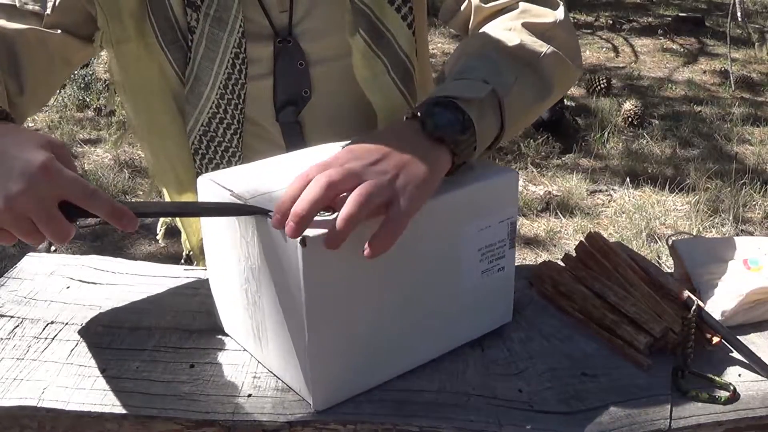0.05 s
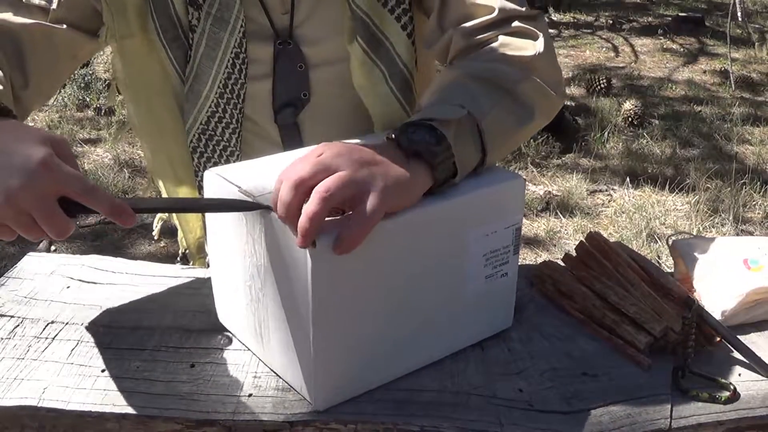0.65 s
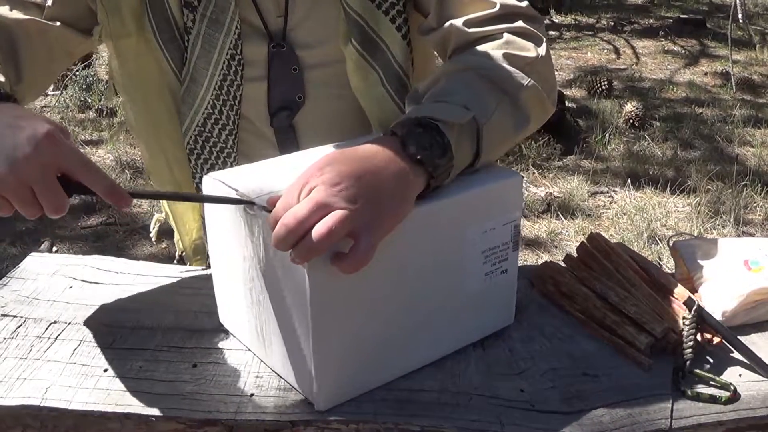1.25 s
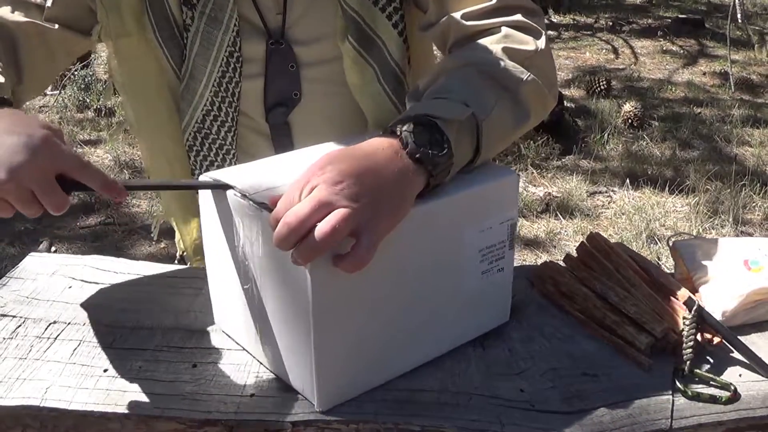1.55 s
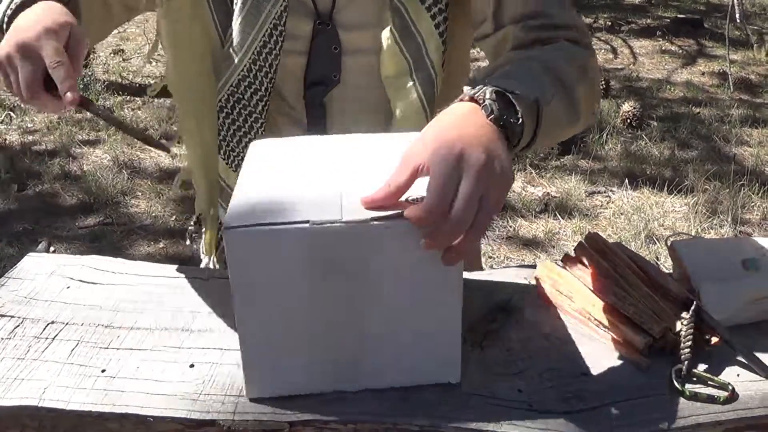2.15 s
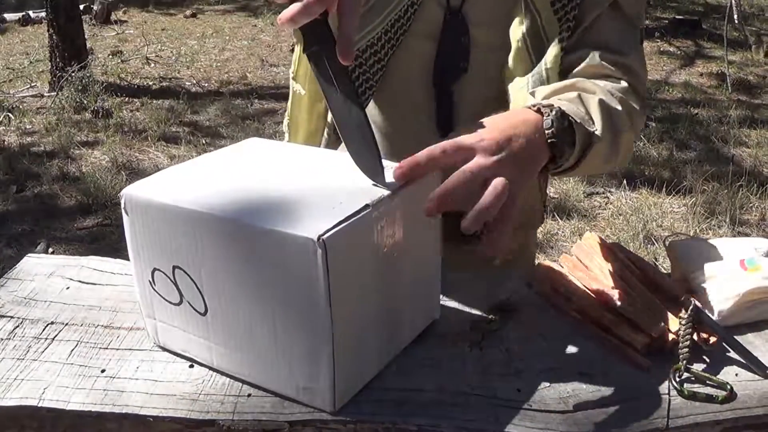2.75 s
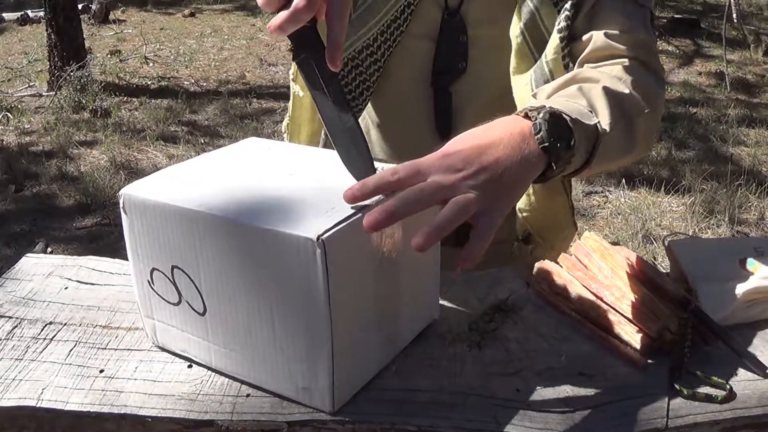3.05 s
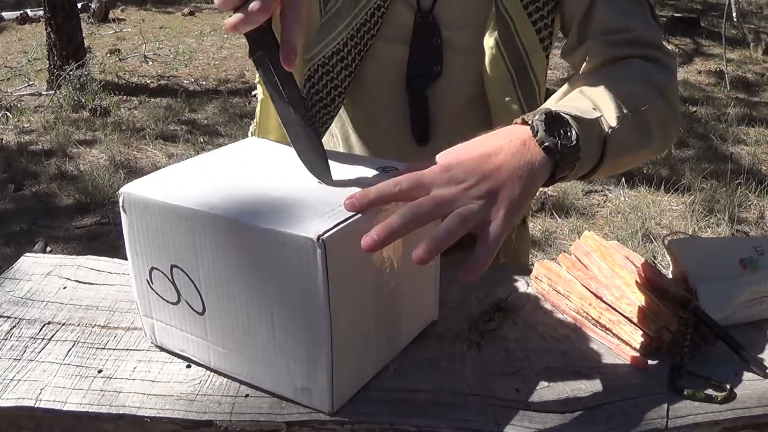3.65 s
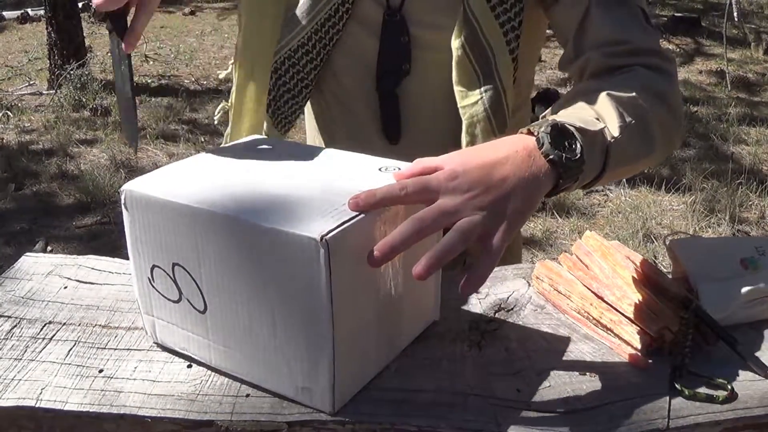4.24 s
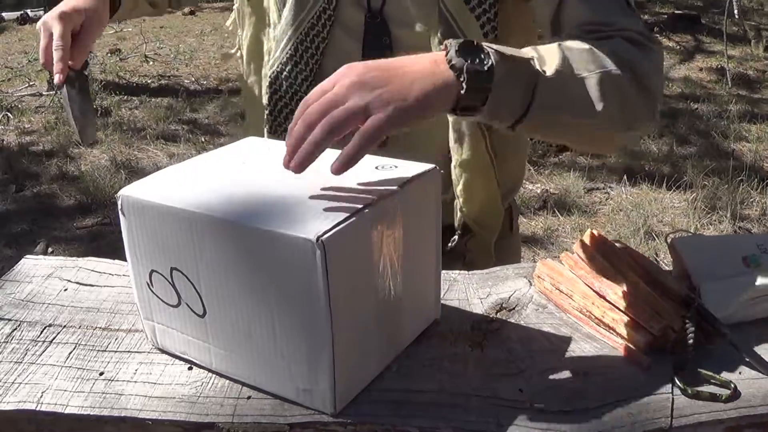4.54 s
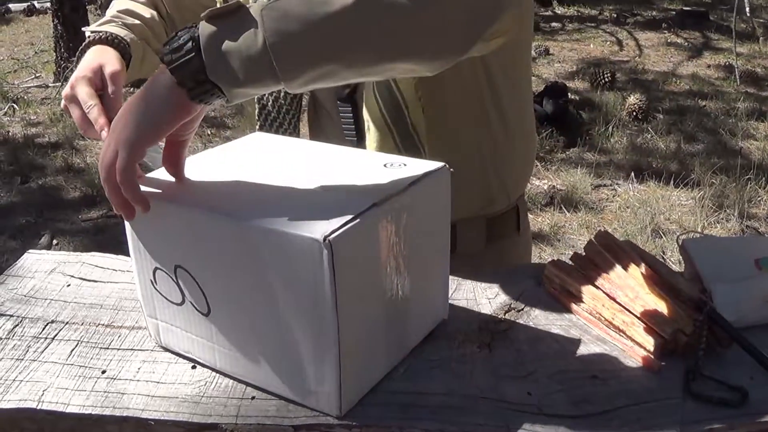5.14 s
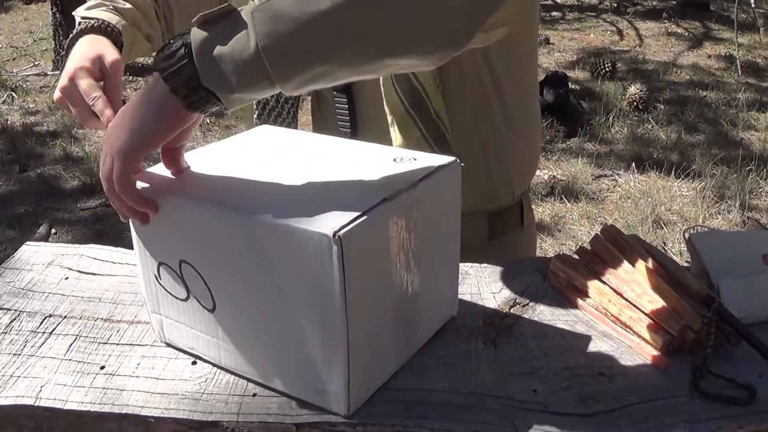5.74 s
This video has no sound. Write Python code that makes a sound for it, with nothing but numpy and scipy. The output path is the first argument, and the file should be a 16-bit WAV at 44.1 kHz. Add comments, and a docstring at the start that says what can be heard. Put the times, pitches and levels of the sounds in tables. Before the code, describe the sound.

A knife cuts packing tape on a cardboard box, close to the microphone and slightly left, over faint, still outdoor air. Short hissing, rasping strokes begin at once, and the blade judders with a low buzz from 0.7 to 1 second. Bright tape snaps and hollow knocks build to a loud pop at about 1.4 seconds as the flap springs free. From 1.5 to 2.6 seconds the box is shoved round on a wooden table, scraping, booming and knocking, with more sharp ticks. After a lull, a snap and a firm knock come at 3.4 seconds. A long cut swells from 3.5 seconds and ends around 4.2 in a brief rising groan of the lid and a crack. Then fingers softly rub the cardboard and a sleeve swishes across it, with small taps. Near 5.8 seconds the knife is set on the box with a light ringing knock.

```python
"""A knife slits the packing tape of a cardboard box, close up on a wooden table outdoors.
The blade hisses through the tape, judders along the flap and shakes the hollow box; tape snaps,
panels knock and the freed flap springs up. The box is shoved round, booming on the table top.
A long pull opens the second seam and ends in a rising groan of the lid. Fingers rub the lid,
a sleeve swishes across it, and the knife is set down on the box with a ringing knock."""
import sys
import numpy as np
from scipy import signal
from scipy.fft import rfft, irfft
from scipy.io import wavfile

SR = 44100
rng = np.random.default_rng(int(sys.argv[2]) if len(sys.argv) > 2 else 0)


def output_pcm(signal):
    """Save a mono or channel-first signal as 16-bit PCM at the path in sys.argv[1].

    Samples are clipped to [-1, 1] before scaling.
    """
    pcm = np.clip(np.atleast_2d(signal).T, -1, 1) * 32767
    wavfile.write(sys.argv[1], SR, np.round(pcm).astype(np.int16))


N = 255339
TIME = np.arange(N) / SR
HZ = np.fft.rfftfreq(N, 1 / SR)

# spectrum of rasping or cracking cardboard: f/Hz, level/dB
CARDBOARD_EQ = [(470, -10), (850, -3), (1250, -4), (1700, -1.5), (2100, -3), (2650, -3.5), (3500, -2.5),
                (4100, -6), (5100, -11.5), (6300, -5), (12000, -45)]
# spectrum of a bright tick of tape: f/Hz, level/dB
TICK_EQ = [(1500, -35), (3000, -12), (4200, -5), (5500, -9), (7500, -3), (10300, 2), (12000, 0),
           (13500, -6), (16000, -15)]


def amp(db):
    """Decibels to gain."""
    return 10 ** (np.asarray(db) / 20)


def unit(x):
    """Scales to rms 1."""
    return x / np.sqrt(np.mean(x ** 2) + 1e-20)


def peaked(x):
    """Scales to peak 1."""
    return x / abs(x).max()


def read(points, hz):
    """Reads a curve on a log-frequency axis."""
    f, value = np.transpose(points)
    return np.interp(np.log(hz + 1), np.log(f + 1), value)


def add(mix, s, sound):
    """Mixes a sound in at time s."""
    part = mix[max(round(s * SR), 0):][:len(sound)]
    part += sound[:len(part)]


def ring(x, response):
    """Passes x through an impulse response."""
    return signal.oaconvolve(x, response)[:len(x)]


def colour(eq, size=4096):
    """Minimum-phase impulse response of an EQ curve (f/Hz, level/dB)."""
    hz = abs(np.fft.fftfreq(size, 1 / SR))
    log_gain = np.log(amp(np.maximum(read(eq, hz), -100)))
    return np.fft.ifft(np.exp(np.conj(signal.hilbert(log_gain)))).real[:size // 2]


def drift(hz):
    """Random wander of rms 1, up to about the given rate."""
    return unit(irfft(rfft(rng.standard_normal(N)) / (1 + (HZ / hz) ** 4), N))


def burst(eq, t60, scatter, size=4096):
    """A sharp break followed by a quickly dying spray of smaller ones, peak 1."""
    spray = scatter * rng.standard_normal(size) * amp(-60 * np.arange(size) / SR / t60)
    spray[0] = 1
    return peaked(ring(spray, colour(eq)))


def clicks(per_s, spread_db):
    """Impulses at random times, a few much louder than the rest."""
    size = amp(spread_db * np.minimum(rng.exponential(1, N), 3))
    return size * (rng.random(N) < per_s / SR)


def swell(start, rise_s, fall_s, db, onset_db, fade_db, attack_s=0.0091, release_s=0.01):
    """Envelope of one stroke: it bites below its peak, swells, eases off and stops."""
    t, length = TIME - start, abs(rise_s) + abs(fall_s)
    gain = np.clip(np.minimum(t / attack_s, (length - t) / release_s) + 1, 0, 1)
    on = gain > 0
    gain[on] *= amp(db + np.interp(t[on], [0, abs(rise_s), length], [onset_db, 0, fade_db]))
    return gain


def stroke_power(strokes, onset_db, fade_db):
    """Power envelopes of hiss, rasp and shake over a series of strokes."""
    gains = np.array([swell(*row[:4], onset_db, fade_db) for row in strokes])
    shares = amp([(0, rasp_db, shake_db) for *_, rasp_db, shake_db in strokes])
    return shares.T ** 2 @ gains ** 2


def ambience(air_db=-59, whine_hz=15734, whine_db=-76):
    """A bed of still outdoor air, microphone hiss and the camera's thin whine."""
    # spectrum of the bed: f/Hz, level/dB
    air_eq = [(12, -46), (20, -15), (248, -7), (337, -2.5), (410, -6), (472, -5), (2080, -16), (2670, -13),
              (3160, -18), (11800, -23.5), (16000, -26)]
    # likeness of left and right: f/Hz, correlation
    correlation = [(60, 1), (240, 0.91), (950, 0.088), (3770, 0.68), (15000, 1)]
    left, independent = rfft(rng.standard_normal((2, N)))
    same = np.clip(read(correlation, HZ), -1, 1)
    right = same * left + np.sqrt(1 - same ** 2) * independent
    air = unit(irfft(np.array([left, right]) * amp(read(air_eq, HZ)), N))
    whine = unit(np.sin(2 * np.pi * whine_hz * TIME))
    return amp(air_db + .5 * drift(hz=15)) * air + amp(whine_db) * whine


def steadying_hand(until_s=2.83, wander_db=2.0):
    """Fingers shift faintly as they hold the box: power of hiss, rasp and shake."""
    gains = amp([-65, -61.5, -60.5])[:, None]
    return (gains * (TIME < until_s) * amp(wander_db * drift(hz=22))) ** 2


def short_cuts():
    """The blade works along the tape in short strokes: power of hiss, rasp and shake."""
    # t/s, swell/s, fade/s, hiss/dB, rasp/dB re hiss, shake/dB re hiss
    strokes = [(0, 0.01, 0.012, -55, 7, 3), (.083, 0.0067, 0.061, -59, -12, 7.5),
               (.19, 0.15, .04, -43.5, -0.5, -11.5), (.442, 0.0064, 0.062, -48.5, -2, -11),
               (.52, 0.017, .018, -46.5, 3, -16), (.654, 0.015, .028, -39.5, -4.5, -3),
               (.7, 0.16, .1, -47, 3.5, 4), (.91, 0.097, .02, -42, -1.5, -10),
               (.995, 0.06, 0.0047, -35, -11, -9.5), (1.07, .01, 0.26, -55.5, -4, -2),
               (1.208, 0.06, 0.0091, -35, -1.5, -1), (1.33, 0.087, 0.023, -55.5, -2, 5),
               (1.44, 0.022, 0.051, -34.5, 1.5, -0.5), (2.66, 0.13, 0.022, -54.5, -8, -10),
               (3.3, 0.038, .03, -60, -8, -5), (3.376, 0.013, .035, -40.5, -0.5, 1)]
    return stroke_power(strokes, onset_db=-6.5, fade_db=-8)


def catches(per_s, slack_s):
    """Grip of a sliding edge around its mean: it jumps at each catch, then slackens."""
    jumps = (rng.random(N) < per_s / SR) * rng.uniform(0.81, 1, N)
    grip = signal.lfilter([1], [1, -np.exp(-1 / (slack_s * SR))], jumps)
    return np.minimum(unit(grip - grip.mean()), 3)


def fibres(per_s, spread_db, smooth):
    """Fibres giving way: clicks of uneven size over a smooth rub."""
    size = amp(spread_db * np.minimum(rng.exponential(1, N), 4)) * rng.choice([-1, 1], N)
    crackle = unit(size * (rng.random(N) < per_s / SR))
    return unit(crackle + smooth * rng.standard_normal(N))


def box_response(contact_s=0.00064, size=4096):
    """The hollow box after one push; soft cardboard spreads the contact and radiates no deep bass."""
    # modes of the box: f/Hz, bandwidth/Hz, level/dB
    modes = [(88.5, 18, -19), (135, 40, -9.5), (178.4, 67, 3), (241.5, 85, 0), (322, 80, -4.5),
             (496, 92, 0.5), (585, 58, 5.5), (662, 49, 0.5), (990, 110, -48.5), (1080, 180, -7),
             (1670, 860, -1), (2200, 200, -38), (3660, 86, -31)]
    t = np.arange(size) / SR
    body = sum(amp(db) * width * np.exp(-np.pi * width * t) * np.cos(2 * np.pi * hz * t)
               for hz, width, db in modes)
    push = np.sin(np.pi * np.minimum(t / contact_s, 1)) ** 2
    low_cut = colour([(30, -54), (60, -5), (105, 4)])
    return peaked(ring(ring(body, push), low_cut))


def friction(glide, scrape, push):
    """Tape hisses, cardboard rasps, the box shakes; a light stroke glides, a pressed one catches."""
    # spectrum of tape hiss: f/Hz, level/dB
    tape_eq = [(2800, -20), (4200, -23), (5600, -21), (7500, -5), (9000, 0.5), (10500, 1), (12000, -2.5),
               (13500, -13.5), (16000, -25)]
    pressure = push / (push + amp(-62.5))
    grip = catches(per_s=130, slack_s=0.0035) * pressure
    hiss = unit(ring(fibres(per_s=3000, spread_db=4, smooth=1.0), colour(tape_eq)))
    hiss *= amp(2.73 * grip)
    rasp = unit(ring(fibres(per_s=2500, spread_db=3.5, smooth=1.0), colour(CARDBOARD_EQ)))
    rasp *= amp(1.8 * grip)
    tugs = fibres(per_s=900, spread_db=3.0, smooth=0.52) * amp(2 * grip)
    shake = unit(ring(tugs, box_response()))
    return amp(-0.5) * hiss * glide + amp(-5.5) * rasp * scrape + amp(-1.5) * shake * push


def tape_rip(glide, fast_db=-35):
    """When the tape parts fast its hiss coarsens and reaches lower."""
    # spectrum of fast-tearing tape: f/Hz, level/dB
    rip_eq = [(2500, -22), (4000, -7), (6000, 0), (7500, -7), (10000, -26)]
    speed = glide / (glide + amp(fast_db))
    tear = unit(ring(fibres(per_s=1500, spread_db=1, smooth=.5), colour(rip_eq)))
    return amp(-12) * tear * glide * speed


def tape_crinkles(glide, firm_db=-44):
    """Loose edges of tape tick at random while rubbed; a firm stroke holds them down."""
    ticks = ring(clicks(per_s=45, spread_db=5), burst(TICK_EQ, t60=.009, scatter=.15))
    return amp(10) * ticks * glide / (1 + glide / amp(firm_db))


def tape_settling():
    """Cut tape and fibres creep back with tiny ticks, even when nothing rubs them."""
    return amp(-52) * ring(clicks(per_s=8, spread_db=3), burst(TICK_EQ, t60=0.015, scatter=0.29))


def panel(hz, t60, rise_s=0.002, size=6000):
    """One decaying mode of a struck panel, peak 1."""
    t = np.arange(size) / SR
    envelope = amp(-60 * t / max(t60, .003)) * (1 - np.exp(-t / rise_s))
    return peaked(np.sin(2 * np.pi * hz * t) * envelope)


def knocks(overtone_ratio=1.417):
    """A blow swings the struck panel, rings the whole box and pops the card."""
    # t/s, level/dB, panel f/Hz, box/dB re level, pop/dB re level
    blows = [(.03, -43, 690, 4.5, -19), (.215, -49, 410, 10, 15), (.543, -46, 1280, -10, 14.5),
             (1.0006, -32, 199, 5, -4), (1.25, -29.5, 694, 2, 6), (1.336, -46, 1090, -4, 6),
             (1.4468, -20.5, 870, -1, 0), (1.561, -36, 1195, -2, 7), (1.788, -38, 258, 4, 6),
             (1.927, -36.5, 650, -2, -5), (2.06, -36.5, 260, 0, -18), (2.081, -31, 620, -1, -7),
             (2.152, -31.5, 205, 4.5, -5), (2.2066, -21.5, 694, -9.5, 1), (2.625, -39, 164, 3, -3),
             (2.737, -44, 1310, -1, 4), (2.78, -35.5, 617, 1.5, 3.5), (3.4183, -19.5, 677, -6.5, 4.5),
             (3.644, -38.5, 630, -4, 8), (3.735, -29.5, 190, 2.5, -2), (3.917, -29, 221, 4, -8),
             (3.934, -30.5, 606, 4.5, -6), (4.047, -26, 200, -18, -22), (4.2432, -24.5, 730, -13, -11),
             (4.329, -38, 650, -5, -3), (4.5901, -34, 880, -9, 4), (4.905, -43, 115, -2, -15),
             (5.385, -46.5, 140, 2, -13), (5.522, -36, 185, 2, -6.5)]
    # spectrum of the pop: f/Hz, level/dB
    pop_eq = [(400, -17), (900, 3), (1200, 4), (1650, 3.5), (2200, 2.5), (2700, -7.5),
              (3700, -8.5), (9000, -22.5)]
    out, box = np.zeros(N), box_response()
    for s, db, hz, box_db, pop_db in blows:
        t60 = 0.02 * (600 / hz) ** 0.38  # lower panels ring longer
        tone = panel(hz, t60) + amp(-10) * panel(hz * overtone_ratio, t60 / overtone_ratio)
        add(out, s, amp(db - 3.5) * tone)
        add(out, s, amp(db + box_db) * box)
        add(out, s, amp(db + pop_db) * burst(pop_eq, t60=0.023, scatter=0.067))
    return out


def tape_snaps():
    """Taut tape parts with a bright tick and a crack of the cardboard under it."""
    # t/s, tick level/dB, crack/dB re tick
    snaps = [(0.5322, -18, -12), (0.6639, -21.5, -9), (0.6787, -21, -9), (1.035, -12, -17),
             (1.0475, -21, -29), (1.0842, -25, -26), (1.1633, -16, -15), (1.2489, -10, -10),
             (1.2678, -11, -7), (1.379, -14.5, -10.5), (1.3832, -11.5, -7), (1.4007, -22.5, -14),
             (1.4383, -22, -2), (1.4436, -8, -6), (1.4453, -15.5, 7), (1.5617, -27, 4),
             (2.1641, -8.5, -15.5), (2.1698, -15.5, -13), (2.2507, -17.5, -19), (2.2829, -8, -13.5),
             (2.3257, -22, -5), (2.3605, -31, 3), (2.7779, -23.5, -7.5), (3.1248, -35.5, -23),
             (3.3393, -33.5, -18), (3.3756, -14.5, -8.5), (3.3979, -19, -1), (4.041, -11.5, -13),
             (4.242, -15, 3), (4.8935, -30, -9), (5.698, -29, -15)]
    out = np.zeros(N)
    for s, db, crack_db in snaps:
        tick = burst(TICK_EQ, t60=.008, scatter=.12)
        crack = burst(CARDBOARD_EQ, t60=0.016, scatter=0.086)
        add(out, s, amp(db) * (tick + amp(crack_db) * crack))
    return out


def blade_judder(rate_jitter=.035, uneven_db=1.0):
    """The blade sticks and slips, quicker as it speeds up; each slip kicks the flap, which hums."""
    # one list for each run of slips: t/s, slip rate/Hz, level/dB
    runs = [
        [(0.686, 57, -38), (0.722, 51, -26.5), (0.76, 57, -26), (0.786, 91, -30), (0.841, 107, -32.5),
         (0.88, 100, -37.5), (0.915, 93, -33), (0.935, 100, -38)],
        [(.999, 80, -28), (1.045, 85, -38)],
    ]
    slips = np.zeros(N)
    wander = 1 + rate_jitter * drift(hz=61)
    force = amp(uneven_db * drift(hz=90))
    for run in runs:
        s, rate, db = np.transpose(run)
        t = np.arange(s[0], s[-1], 1 / SR)
        cycles = np.cumsum(np.interp(t, s, rate) * wander[:len(t)]) / SR
        kicks = np.diff(np.floor(cycles), prepend=0)
        add(slips, s[0], kicks * amp(np.interp(t, s, db)))
    flap = colour([(90, -17), (200, 6), (340, 3.5), (480, 2), (900, -2), (1600, -2),
                   (2300, -27), (5000, -4)])
    body = peaked(ring(box_response(contact_s=0.00026), flap))
    return amp(-1) * ring(slips * force, body)


def sheet_ring(s, modes):
    """A loose sheet of the box rings freely in its own modes from time s."""
    out = np.zeros(N)
    for hz, db, t60 in modes:
        add(out, s, amp(db - 1.5) * panel(hz, t60))
    return out


def flap_spring():
    """The freed flap springs up and rings."""
    # modes of the flap: f/Hz, level/dB, t60/s
    modes = [(122, -28, .1), (570, -17, 0.017), (1640, -20.5, 0.024), (2200, -29, 0.032)]
    return sheet_ring(s=1.448, modes=modes)


def shoves():
    """The box is slid round on the table: power of hiss, rasp and shake."""
    # t/s, swell/s, fade/s, hiss/dB, rasp/dB re hiss, shake/dB re hiss
    strokes = [(1.53, 0.015, .09, -63.5, 11.5, 16), (1.61, 0.059, 0.14, -49.5, 4, -1.5),
               (1.735, 0.055, 0.047, -39, 1, -4), (1.835, 0.087, 0.059, -43, -0.5, -5.5),
               (1.99, 0.086, .03, -51, 2.5, -10), (2.09, 0.027, 0.1, -39, -2, -5.5),
               (2.215, 0.022, 0.095, -42, 2.5, 2), (2.3, 0.047, 0.15, -41, 3.5, -4),
               (2.5, 0.019, 0.19, -55, -2, -15)]
    return stroke_power(strokes, onset_db=-6.5, fade_db=-11)


def table_boom():
    """The sliding box rubs the table top, which booms in its lowest mode."""
    _, _, shake_power = shoves()
    mode = panel(hz=97, t60=0.052)
    boom = unit(ring(ring(rng.standard_normal(N), mode), mode))
    return amp(-15) * boom * np.sqrt(shake_power)


def long_pull(edge_s=.005, usual_drag_db=-53.5):
    """The blade drags down the second seam: power of hiss, and of rasp and shake that grow with drag."""
    # t/s, tape hiss/dB, drag on the cardboard/dB
    gesture = [(3.514, -62, -69), (3.56, -54.5, -55), (3.73, -43.5, -47), (3.825, -49.5, -45.5),
               (3.894, -44, -41), (3.935, -39.5, -39.5), (3.957, -47, -45), (3.99, -38.5, -37.5),
               (4.022, -45, -41), (4.048, -38.5, -37), (4.13, -42, -38.5), (4.18, -33.5, -31),
               (4.215, -36.5, -33.5), (4.243, -46, -35)]
    s, hiss_points, drag_points = np.transpose(gesture)
    hiss_db = np.interp(TIME, s, hiss_points)
    drag_db = np.interp(TIME, s, drag_points)
    rasp_db = drag_db - 2 + 0.061 * (drag_db - usual_drag_db)
    shake_db = drag_db + 0.68 - 0.15 * (drag_db - usual_drag_db)
    gate = np.clip(np.minimum(TIME - s[0], s[-1] - TIME) / edge_s + 1, 0, 1)
    return (gate * amp([hiss_db, rasp_db, shake_db])) ** 2


def lid_groan(start_s=4.14, rise_s=0.046, fall_s=0.056, start_hz=597, hz_per_s=870, width_hz=150):
    """Friction excites a panel of the lid, which stiffens and rises as the blade nears the edge."""
    hz = start_hz + hz_per_s * np.clip(TIME - start_s, 0, rise_s + fall_s)
    carrier = np.exp(2j * np.pi * np.cumsum(hz) / SR)
    roughness = drift(width_hz / 2) + 1j * drift(width_hz / 2)
    envelope = swell(start_s, rise_s, fall_s, db=-30, onset_db=-10, fade_db=-12)
    return unit((carrier * roughness).real) * envelope


def finger_rubs():
    """Fingers rub the lid: power of hiss, rasp and shake."""
    # t/s, swell/s, fade/s, hiss/dB, rasp/dB re hiss, shake/dB re hiss
    strokes = [(4.33, 0.0081, 0.11, -57.5, 3, -3), (4.44, 0.052, 0.01, -54.5, 3, -17),
               (4.89, 0.098, 0.016, -54.5, -5, 0), (5.13, 0.068, 0.017, -56, 2.5, -14),
               (5.47, 0.056, 0.0059, -58, 3.5, 1), (5.692, 0.073, 0.054, -51.5, 4, 5.5)]
    return stroke_power(strokes, onset_db=-5.5, fade_db=-8)


def sleeve():
    """Cloth catches and rubs in short swishes; the arm pushes a little air at the microphone."""
    # spectra of rubbing cloth and of stirred air: f/Hz, level/dB
    cloth_eq = [(290, -44), (530, 3), (694, -6.5), (871, -1), (1280, 3.5), (1520, -6), (1850, 1.5),
                (2400, -11.5), (4670, -21), (5700, -10.5), (6860, -28), (11300, -18), (15000, -42)]
    puff_eq = [(20, -19), (40, 0), (90, -14), (190, -1.5), (330, -11), (700, -31)]
    # strokes of the cloth and of the air: t/s, swell/s, fade/s, level/dB
    swishes = [(4.43, 0.11, 0.02, -49), (4.574, 0.0045, .006, -42), (4.591, 0.0025, .02, -40.5),
               (4.642, .007, 0.024, -44.5), (4.668, 0.012, 0.037, -49.5), (4.94, 0.032, 0.072, -54.5),
               (5.04, .02, .17, -66)]
    draughts = [(4.425, 0.085, .2, -51.5), (4.89, .02, .08, -69)]
    cloth = unit(ring(fibres(per_s=400, spread_db=3, smooth=.7), colour(cloth_eq)))
    puff = unit(ring(rng.standard_normal(N), colour(puff_eq)))
    cloth *= sum(swell(*row, onset_db=-7, fade_db=-12) for row in swishes)
    puff *= sum(swell(*row, onset_db=-7, fade_db=-12) for row in draughts)
    return cloth + puff


def knife_tap():
    """The knife is set down on the box with a ringing knock."""
    # modes of the lid: f/Hz, level/dB, t60/s
    modes = [(258, -31, 0.064), (575, -38, 0.035), (900, -35, 0.11), (1400, -42, .03)]
    return sheet_ring(s=5.76, modes=modes)


def pan_left(x):
    """The box is left of centre: the left microphone hears it earlier and louder."""
    # left over right: f/Hz, level/dB
    balance = [(150, 0), (500, 1.7), (1200, 3.4), (1800, 4.2), (2800, 3.5), (5500, 3.2), (7500, 2.0),
               (10000, .5), (13000, .1)]
    # left ahead of right: f/Hz, phase/rad
    lead = [(40, .1), (150, .45), (300, .75), (500, 1), (800, 1.08), (1200, 1), (1800, .8), (2800, .22),
            (6000, 0)]
    ratio = amp(read(balance, HZ)) * np.exp(1j * np.clip(read(lead, HZ), -2, 2))
    side = irfft(rfft(x) * (ratio - 1) / (ratio + 1), N)
    return np.array([x + side, x - side])


def reflections(x, t60=0.2, size=6000):
    """Table, body and ground scatter a short, bright echo, with its own tail on each side."""
    t = np.arange(size) / SR
    tails = rng.standard_normal((2, size)) * amp(-60 * t / t60) * (t > .001)
    send = ring(x, colour([(100, -8), (600, -3), (1800, 4), (5000, 6), (12000, -3)]))
    return np.array([ring(send, tail / np.linalg.norm(tail)) for tail in tails])


def scene():
    """Everything at the box, its echoes and the open air."""
    power = short_cuts() + long_pull() + shoves() + finger_rubs() + steadying_hand()
    glide, scrape, push = np.sqrt(power)  # gains of hiss, rasp and shake
    rubbed = friction(glide, scrape, push) + tape_rip(glide) + blade_judder()
    rubbed += lid_groan() + table_boom() + sleeve()
    ticks = tape_snaps() + tape_crinkles(glide) + tape_settling()
    hits = knocks() + flap_spring() + knife_tap()
    close = rubbed + ticks + hits
    return pan_left(close) + amp(-23.5) * reflections(close) + ambience()


def record(dry, low_cut_hz=42, high_cut_hz=16200):
    """A gentle low cut and a steep high cut."""
    low_cut = signal.butter(2, low_cut_hz, "highpass", fs=SR, output="sos")
    high_cut = signal.firwin(511, high_cut_hz, window=("kaiser", 9), fs=SR)
    return signal.oaconvolve(signal.sosfilt(low_cut, dry), high_cut[None], "same")


dry = scene()
out = record(dry)
output_pcm(out)
```